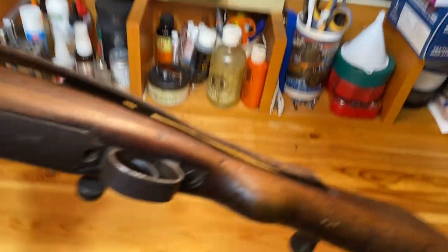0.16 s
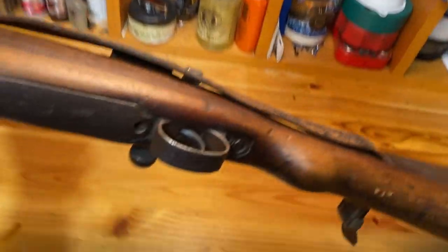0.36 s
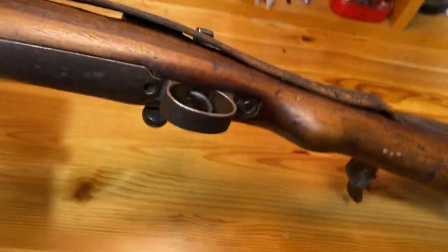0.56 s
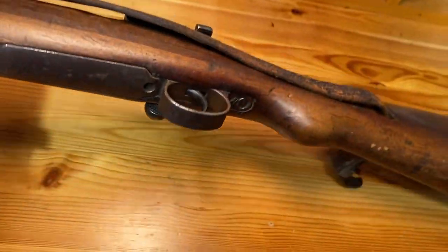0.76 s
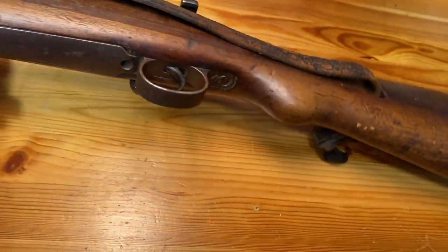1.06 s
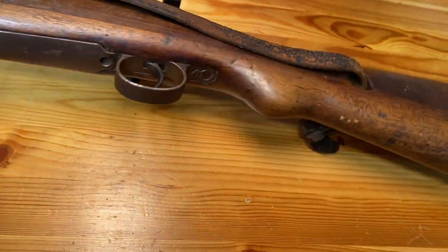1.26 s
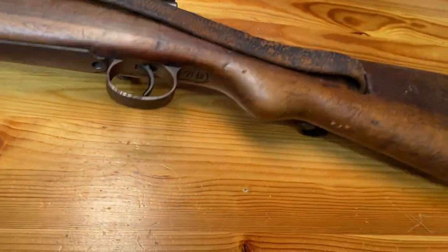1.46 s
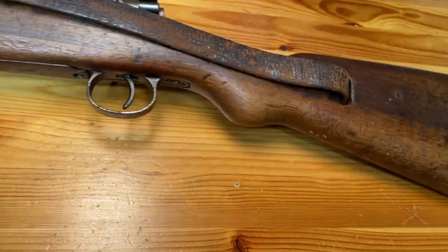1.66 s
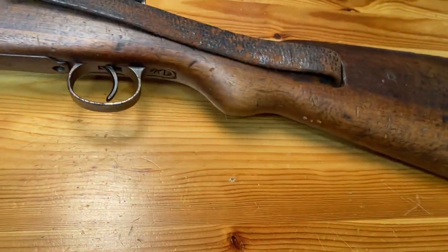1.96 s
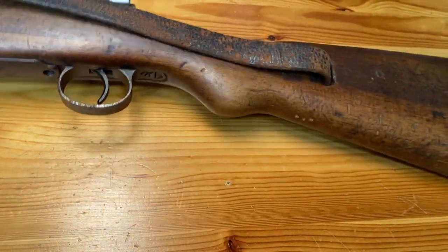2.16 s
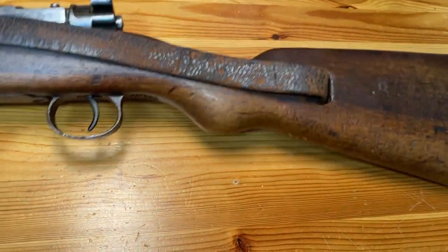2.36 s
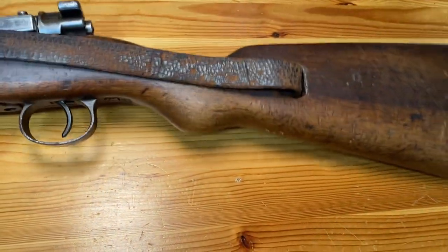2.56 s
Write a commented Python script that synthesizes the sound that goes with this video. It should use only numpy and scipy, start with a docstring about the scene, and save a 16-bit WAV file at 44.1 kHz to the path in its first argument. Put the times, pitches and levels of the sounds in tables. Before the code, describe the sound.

Close up in a small, quiet room, a rifle knocks against a wooden table after faint handling clicks. Its metal fittings rattle and briefly scrape, then the full weight lands with a sharp clunk and settles with lighter knocks.

```python
"""Soft bumps and metal clicks sound in a small, quiet room as a wooden-stocked rifle is turned in the hands.
The stock knocks on a wooden table, a fitting skids, then the whole weight drops and rocks to rest.
Each impact excites the damped modes of stock, table top and legs; the longer the contact, the duller
the knock. Walls and shelves reflect the sound, and the heaviest blow overloads the close microphone."""
import sys
import numpy as np
from scipy import signal
from scipy.fft import rfft, irfft
from scipy.io import wavfile

SR = 44100
rng = np.random.default_rng(int(sys.argv[2]) if len(sys.argv) > 2 else 0)


def wav_record(signal):
    """Record a signal, one row per channel, as 16-bit PCM in the file named by sys.argv[1]."""
    frames = np.transpose(np.atleast_2d(signal))
    bounded = np.clip(frames, -1, 1)
    # unit amplitude maps onto the largest positive 16-bit level
    quanta = np.round(bounded * 32767).astype(np.int16)
    wavfile.write(sys.argv[1], SR, quanta)


N = 119070


def undb(db):
    """Decibel law: 20 dB is a tenfold amplitude."""
    return 10 ** (np.asarray(db) / 20)


def unit(x):
    """Normalisation to rms 1."""
    return x / np.sqrt(np.mean(x ** 2))


def fade(t60):
    """Exponential damping: one second of an envelope that falls 60 dB in t60 seconds."""
    return np.exp(-np.log(1000) * np.arange(SR) / SR / max(t60, 1e-3))


def add(track, start_s, sound):
    """Superposition: a sound adds to the track from its start time."""
    i = int(start_s * SR)
    track[i:i + len(sound)] += sound[:N - i]


def along(points, hz):
    """Interpolation of (frequency_hz, value) points on a log-frequency axis."""
    frequencies, values = np.array(points).T
    return np.interp(np.log(np.maximum(hz, 1)), np.log(frequencies), values)


def noise(spectrum, size):
    """Random phases turn a level spectrum into noise of rms 1."""
    hz = np.fft.rfftfreq(size, 1 / SR)
    phases = np.exp(2j * np.pi * rng.random(len(hz)))
    return unit(irfft(phases * undb(along(spectrum, hz)), size))


def band_noise(hz, width_hz, size):
    """A resonator driven by white noise gives a wavering tone of rms 1."""
    f = np.fft.rfftfreq(size, 1 / SR) + 1
    impedance = 1 + 1j * (f / hz - hz / f) * hz / width_hz
    return unit(irfft(rfft(rng.standard_normal(size)) / impedance, size))


def bandpass(x, hz, half_width_octaves):
    """A minimum-phase filter keeps a smooth band without ringing ahead of the sound."""
    size = len(x)
    f = np.fft.rfftfreq(2 * size, 1 / SR) + 1
    detuning = np.log2(f / hz) / half_width_octaves
    cepstrum = irfft(-np.log(1 + detuning ** 2 + 10 * (detuning / 2) ** 4))
    cepstrum[1:size] *= 2  # folding onto positive time makes the filter causal
    cepstrum[size:] = 0
    return irfft(rfft(x, 2 * size) * np.exp(rfft(cepstrum)))[:size]


def soften(x, cutoff_hz):
    """Second-order low-pass, as in an impact: a longer contact passes less treble."""
    return signal.sosfilt(signal.butter(2, cutoff_hz, fs=SR, output="sos"), x)


def ring(modes, wide=False):
    """Free vibration is a sum of damped modes; on a wide board neighbouring pairs swing in antiphase."""
    t = np.arange(SR) / SR
    out = np.zeros(SR)
    for k, (pitch_hz, level_db, t60_s) in enumerate(modes):
        sign = -1 if wide and k & 2 else 1
        out += sign * undb(level_db) * fade(t60_s) * np.sin(2 * np.pi * pitch_hz * t)
    return out


# Spectrum of the noise floor: frequency_hz, level_db
FLOOR_SPECTRUM = [(20, 0), (40, -8), (80, -18), (130, -17), (220, -31), (500, -36), (1000, -39.5),
                  (2000, -45), (5000, -48.5), (12000, -53)]
def background():
    """Stationary noise: faint broadband rumble and hiss, with a narrow band heard as a low hum."""
    floor = undb(-54) * noise(FLOOR_SPECTRUM, N)
    hum = undb(-67) * band_noise(hz=126, width_hz=18, size=N)
    return floor + hum


# Spectrum of the reverberation: frequency_hz, level_db
ROOM_SPECTRUM = [(40, -17), (180, 7), (480, -1.5), (1200, -0.5), (3000, 3.5), (7000, 9), (15000, 5.5)]
# Reverberation time by band: frequency_hz, t60_s
ROOM_DECAY = [(60, 0.31), (300, 0.5), (800, 0.48), (2500, 0.44), (7000, 0.45), (15000, 0.55)]
def room(x):
    """Reverberation: strong early reflections from near surfaces give way to a faint diffuse tail."""
    room_db, build_s, early_db, early_s = -8.5, 0.004, 3, 0.042
    t, hz = np.arange(SR) / SR, np.fft.rfftfreq(SR, 1 / SR)
    spectrum = rfft(noise(ROOM_SPECTRUM, SR))
    response = np.zeros(SR)
    for band_hz, t60_s in ROOM_DECAY:
        band_share = along([(f, float(f == band_hz)) for f, _ in ROOM_DECAY], hz)
        response += irfft(spectrum * band_share, SR) * fade(t60_s)
    response *= 1 - np.exp(-t / build_s)
    response *= undb(early_db * np.exp(-(t / early_s) ** 4))
    response /= np.sqrt(np.sum(response ** 2))
    return undb(room_db) * signal.fftconvolve(x, response)[:N]


def shelves(x):
    """Specular reflection: the shelves behind the table return one delayed, duller copy."""
    out = np.zeros(N)
    add(out, start_s=0.006808, sound=undb(-12) * soften(x, cutoff_hz=1200))
    return out


# Envelope of the handling rumble: time_s, level_db
RUMBLE_ENVELOPE = [(1.5, -68), (1.6, -55), (1.95, -56), (2.25, -50), (2.7, -51.5)]
# Bumps of the hands on the stock: start_s, thud_db, sway_db
HAND_BUMPS = [(0.4438, -50.5, -46), (0.851, -39.5, -67), (.942, -68, -35)]
def handling():
    """Soft contact excites low frequencies: thuds, a slow sway and a rumble that grows on the table."""
    hand_cutoff_hz, sway_hz, sway_t60_s = 280, 24, 0.25
    rumble = unit(bandpass(rng.standard_normal(N), hz=42, half_width_octaves=0.9))
    out = rumble * undb(np.interp(np.arange(N) / SR, *np.array(RUMBLE_ENVELOPE).T))
    thud = soften(stock_ring(), hand_cutoff_hz)
    sway = soften(ring([(sway_hz, 0, sway_t60_s)]), 2 * sway_hz)
    for start_s, thud_db, sway_db in HAND_BUMPS:
        add(out, start_s, undb(thud_db) * thud + undb(sway_db) * sway)
    return out


# Envelope of metal skidding on wood: time_s, level_db
SCRAPE_ENVELOPE = [(1.668, -54), (1.683, -49), (1.705, -44.5), (1.742, -51), (1.765, -71.5), (1.822, -78)]
def scrape():
    """Stick-slip friction: a fitting skids over the wood in a spray of tiny catches."""
    catches_per_s = 1300
    time_s, level_db = np.array(SCRAPE_ENVELOPE).T
    catches = (rng.random(SR) < catches_per_s / SR) * rng.standard_normal(SR)
    friction = unit(bandpass(catches, hz=2300, half_width_octaves=0.44))
    envelope = undb(np.interp(time_s[0] + np.arange(SR) / SR, time_s, level_db, right=-np.inf))
    out = np.zeros(N)
    add(out, time_s[0], envelope * friction)
    return out


# Modes of the metal fittings: pitch_hz, level_db, t60_s
METAL_MODES = [(846, -5.5, 0.075), (900, 4, 0.013), (1130, -0.5, 0.024), (1224, -14, 0.041),
               (1593, -4.5, 0.047), (1700, -11, 0.07), (2016, -13, .06), (2467, -7.5, 0.16),
               (3050, -8.5, 0.067), (3430, -13.5, 0.035)]
# Their clicks: start_s, rattle_db, rattle_hz, tick_db, tick_hz, tick_t60_s, tick_half_width_octaves
METAL_CLICKS = [(0.4463, -56.5, 1240, -55.5, 2760, .029, .8), (.714, -50, 1200, -58, 2500, .038, .5),
                (.8615, -28.5, 954, -51.5, 2800, 0.041, 0.91),
                (.9044, -46, 3200, -43.5, 10500, 0.024, 0.61), (.9565, -57, 1460, -47.5, 4000, .029, 0.74),
                (1.5653, -35.5, 2690, -52, 2980, .06, 0.82), (1.572, -62, 2000, -54, 7000, 0.058, .7),
                (1.6168, -51, 3040, -49.5, 9050, .011, 0.6), (1.6975, -21, 1438, -47, 2770, 0.073, 0.58),
                (1.701, -20.5, 1420, -44.5, 6260, 0.026, .5), (2.28, -39, 1420, -55.5, 2300, .06, .45),
                (2.3033, -25, 1700, -28.5, 4340, 0.036, .9), (2.312, -28.5, 1494, -41, 8000, 0.071, 0.77),
                (2.404, -48.5, 2000, -50.5, 11100, .06, .5), (2.4288, -36, 1550, -49.5, 6000, .022, .65)]
def fittings():
    """Hard contact excites high frequencies: loose metal parts meet with a rattle and a bright tick."""
    rattle_octaves, rattle_t60_s, clatter_db = 0.65, 0.039, -5
    out, size = np.zeros(N), SR // 4
    metal = ring(METAL_MODES)[:size]
    for start_s, rattle_db, rattle_hz, tick_db, tick_hz, tick_t60_s, tick_octaves in METAL_CLICKS:
        clatter_noise, tick_noise = rng.standard_normal((2, size))
        clatter = unit(bandpass(clatter_noise, rattle_hz, rattle_octaves)) * fade(rattle_t60_s)[:size]
        rattle = undb(clatter_db) * clatter + bandpass(metal, rattle_hz, rattle_octaves) / 2
        tick = unit(bandpass(tick_noise, tick_hz, tick_octaves)) * fade(tick_t60_s)[:size]
        add(out, start_s, undb(rattle_db) * rattle + undb(tick_db) * tick)
    return out


# Modes of the table shaking on its legs: pitch_hz, level_db, t60_s
LEG_MODES = [(32.22, -0.5, 0.74), (53.4, -6, 0.36), (79.5, 3, 0.24), (108.47, -5, 0.57), (126.6, -6, 0.34)]
def table_shake():
    """Mass on springs: the table shakes slowly on its legs."""
    return ring(LEG_MODES, wide=True)


# Modes of the table top: pitch_hz, level_db, t60_s
TOP_MODES = [(184.9, -10, 0.26), (273.7, -16.5, 0.31), (353, -15.5, 0.59), (477, 3, 0.11),
             (550, -10.5, 0.21), (607, -8, 0.073), (673, -22, 0.052), (727.5, -8, 0.16),
             (783.6, -1.5, 0.12), (881, -3, 0.079), (1011.6, -0.5, 0.028), (1190, -14.5, 0.15),
             (1345, -26.5, 0.17)]
def top_ring():
    """Plate vibration: the wide wooden top rings in its bending modes."""
    return ring(TOP_MODES, wide=True)


# Modes of the rifle stock: pitch_hz, level_db, t60_s
STOCK_MODES = [(172.8, -11, 0.14), (380, -4.5, 0.054), (433.2, -3.5, 0.063), (471.5, -3, 0.097),
               (552.7, -9.5, 0.088), (591, -10, 0.09), (707, -10, .045), (802, -27, 0.12),
               (1162, -11.5, .055)]
def stock_ring():
    """Beam vibration: the wooden stock rings in heavily damped modes."""
    return ring(STOCK_MODES)


def thump():
    """Stiffness raises pitch: the stock's lowest bend glides upward as it presses on the wood."""
    start_hz, end_hz, rise_s = 163, 228, 0.024
    t = np.arange(SR) / SR
    pitch_hz = end_hz + (start_hz - end_hz) * np.exp(-t / rise_s)
    return fade(t60=0.16) * np.sin(2 * np.pi * np.cumsum(pitch_hz) / SR)


# Spectrum of the dense wood modes: frequency_hz, level_db
CRACK_SPECTRUM = [(100, -1.5), (300, 1), (800, 2.5), (1300, -1.5), (2000, -10.5), (3000, -9.5), (4500, -15),
                  (8000, -36), (15000, -30)]
def wood_crack():
    """Modal overlap: densely spaced wood modes merge into a short burst of noise."""
    return noise(CRACK_SPECTRUM, SR) * fade(t60=0.12)


# Blows of rifle on table: start_s, stock_db, top_db, shake_db, crack_db, contact_cutoff_hz, thump_db
TABLE_BLOWS = [(1.5659, -10, -39, -27.5, -15, 830, -14), (1.6775, -14, -37.5, -33.5, -18, 820, -15.5),
               (1.696, -25, -31, -41, -25, 1300, -19.5), (1.7432, -23.5, -41, -26, -17.5, 310, -26.5),
               (1.762, -43, -47, -30, -34, 300, -26), (1.8217, -31, -42, -32, -30, 500, -37.5),
               (2.0766, -19.5, -44.5, -37.5, -24, 520, -23), (2.288, -34, -50, -12.5, -47.5, 45, -63.5),
               (2.303, -16.5, -4, -15, -7.5, 2300, -29.5), (2.4228, -19, -31.5, -31.5, -21, 650, -31.5),
               (2.497, -23.5, -33.5, -33, -23.5, 780, -29), (2.556, -42, -65, -40.5, -50, 693, -53.5)]
def knocks():
    """Impact excitation: each blow rings stock and table together, its contact time limiting the treble."""
    radiation_cutoff_hz = 138  # the narrow stock radiates little below this
    radiation = signal.butter(2, radiation_cutoff_hz, "high", fs=SR, output="sos")
    stock = signal.sosfilt(radiation, stock_ring())
    top, shake, bend = top_ring(), table_shake(), thump()
    out = np.zeros(N)
    for start_s, stock_db, top_db, shake_db, crack_db, contact_cutoff_hz, thump_db in TABLE_BLOWS:
        rifle = undb(stock_db) * stock + undb(thump_db) * bend
        table = undb(top_db) * top + undb(shake_db) * shake
        crack = undb(crack_db) * wood_crack()
        add(out, start_s, soften(rifle + table + crack, contact_cutoff_hz))
    return out


def scene():
    """Superposition: direct sound, reflections and background add in one channel."""
    direct = knocks() + fittings() + scrape() + handling()
    return (direct + shelves(direct) + room(direct) + background())[None]


def record(dry):
    """Saturation and band limiting: the microphone flattens the highest peaks and loses the top treble."""
    clip_level, band_edge_hz = 0.97, 15900
    clipped = dry / (1 + (dry / clip_level) ** 8) ** (1 / 8)
    dulled = soften(clipped, cutoff_hz=14700)
    band_limit = signal.ellip(8, 0.2, 70, band_edge_hz, fs=SR, output="sos")
    return signal.sosfilt(band_limit, dulled)


dry = scene()
out = record(dry)
wav_record(out)
```